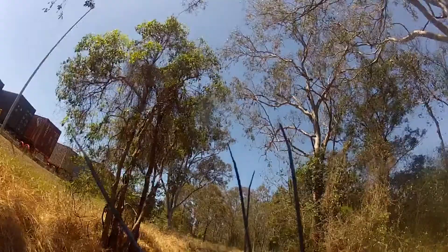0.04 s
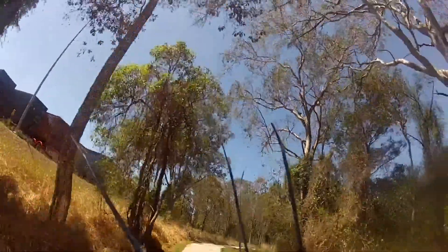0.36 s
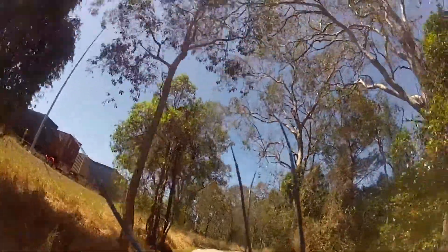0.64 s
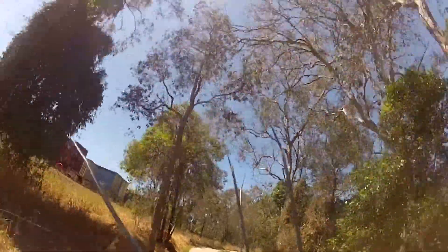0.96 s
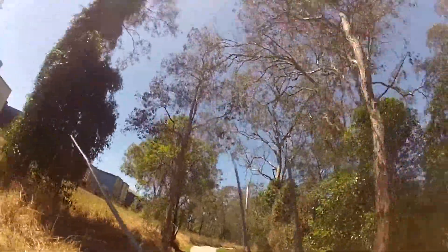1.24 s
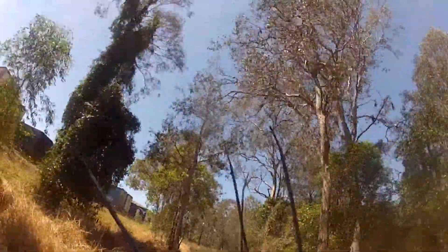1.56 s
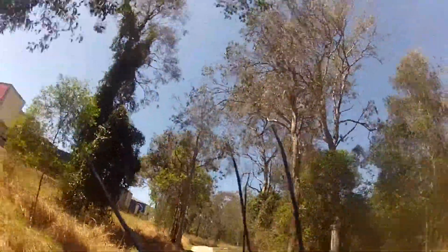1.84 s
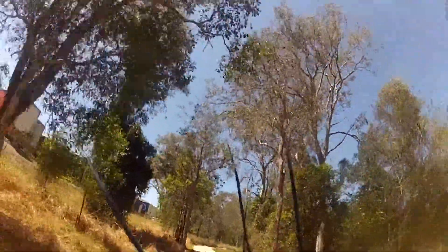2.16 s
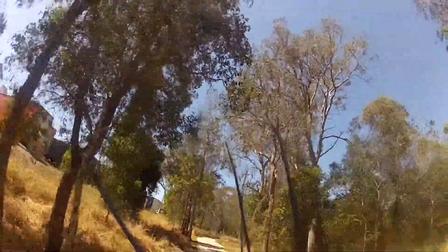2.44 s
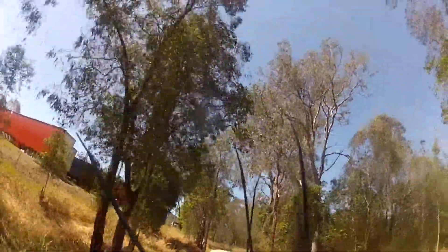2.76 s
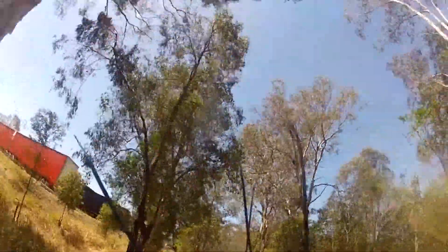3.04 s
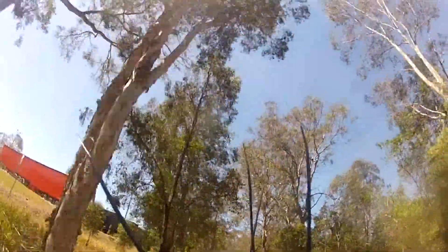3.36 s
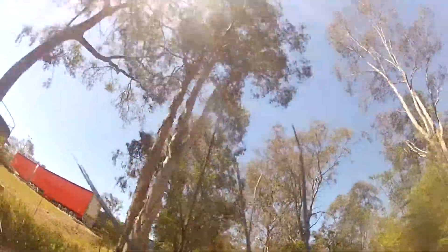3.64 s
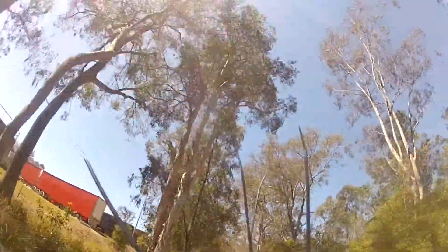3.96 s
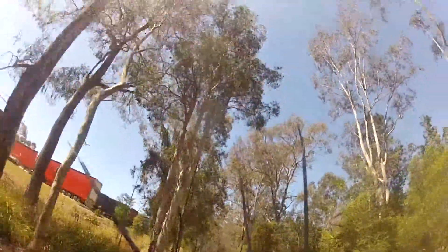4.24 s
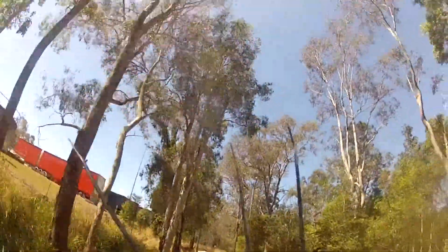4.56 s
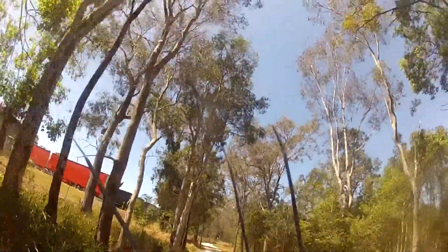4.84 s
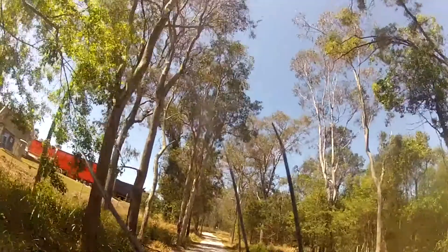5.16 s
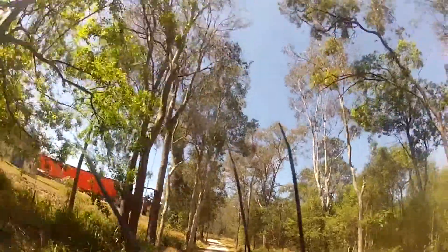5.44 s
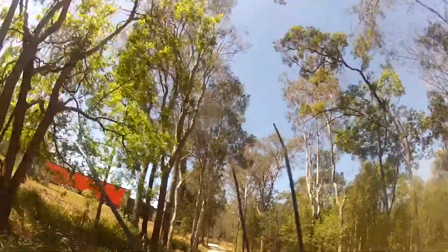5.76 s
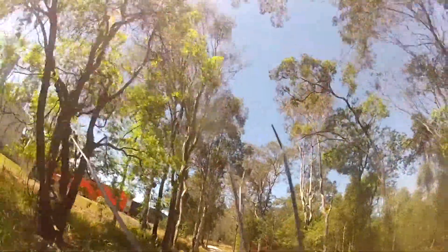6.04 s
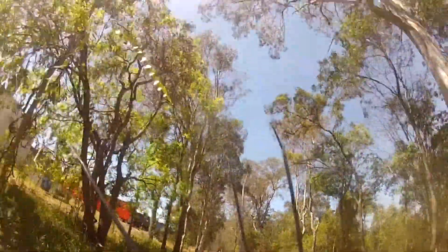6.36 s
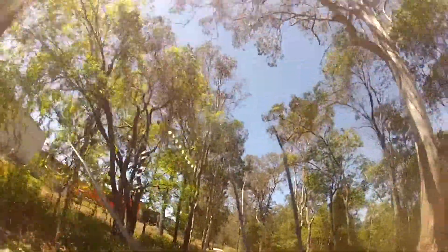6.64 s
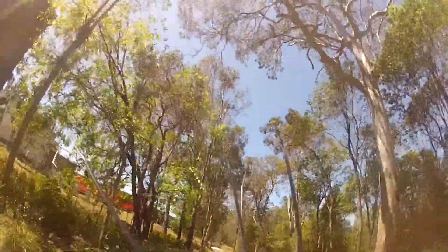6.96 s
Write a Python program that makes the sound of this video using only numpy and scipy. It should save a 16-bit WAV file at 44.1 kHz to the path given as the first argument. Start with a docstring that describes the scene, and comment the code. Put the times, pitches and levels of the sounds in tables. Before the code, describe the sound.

Wind thumps and roars on a microphone riding along a bush track, dropping briefly midway to reveal light rattles.

```python
"""Wind thumps, roars and rasps on the microphone of a small camera riding along a bush track.
Big swirls of air make the thumps; smaller ones make the roar and the bursts of rasp. Half way the
wind drops for a moment and the ride rattles. Tyres crunch faintly and a bird chirps twice.
The camera rounds off the peaks and holds each sample at a low rate, which adds a fizzy treble."""
import sys
import numpy as np
from scipy import signal
from scipy.fft import rfft, irfft
from scipy.io import wavfile
from scipy.ndimage import uniform_filter1d

SR = 44100
rng = np.random.default_rng(int(sys.argv[2]) if len(sys.argv) > 2 else 0)


def master_out(mix):
    """Clip the mix to full scale and print it as 16-bit PCM to the path in sys.argv[1]."""
    frames = np.transpose(np.atleast_2d(mix))
    ceiling = np.clip(frames, -1, 1)
    pcm = np.round(ceiling * 32767).astype(np.int16)
    wavfile.write(sys.argv[1], SR, pcm)


N = 308259
TIME = np.arange(N) / SR


def wind(cruise_db=-28, gust_db=0.53, gust_hz=7, thump_db=1.5, thump_hz=8, flutter_hz=24):
    """One airflow drives big, middling and small swirls of air that push on the microphone."""
    # Each row: time in seconds, strength of the airflow in dB.
    airflow = [(0.19, -29), (0.45, -25), (0.72, -25.5), (0.89, -32), (1.1, -25.5), (1.23, -27.5),
               (1.32, -24), (1.55, -29.5), (1.65, -25), (1.73, -29), (1.95, -22), (2.02, -26),
               (2.13, -24.5), (2.46, -27), (2.83, -26.5), (2.92, -28.5), (3.12, -25), (3.38, -31),
               (3.52, -37.5), (3.85, -48.5), (3.92, -40.5), (4.18, -46), (4.38, -44), (4.59, -28.5),
               (4.68, -35.5), (4.77, -26), (4.84, -32), (4.95, -26.5), (5.27, -26), (5.68, -33),
               (5.78, -30.5), (6.08, -26.5), (6.37, -28.5), (6.58, -31), (6.71, -28), (6.98, -31.5)]
    # Each row: time in seconds, bass boost or cut in dB.
    bass_changes = [(0.19, -0.5), (0.75, 0.5), (0.82, -1.5), (1.15, 0), (1.97, 0.5), (2.25, 1), (2.55, -4),
                    (2.9, 0), (3.8, 0), (5.3, 0.5), (6.2, 0.5), (6.98, -1)]
    # The tone of big, middling and small swirls. Each row: frequency in Hz, relative level in dB.
    buffet_tone = [(12, -25), (25, -12.5), (45, -6.5), (80, -1.5), (200, -1), (300, -2.5), (420, -12),
                   (700, -34.5)]
    roar_tone = [(150, -16), (270, -9.5), (380, -2), (520, -3.5), (720, -7.5), (950, -16.5), (1300, -38.5),
                 (2000, -69)]
    rasp_tone = [(450, -32.5), (800, 1.5), (1200, 0), (2000, -7), (2700, -10.5), (3500, -17), (3950, -13.5),
                 (4500, -23.5), (5100, -21), (6000, -23.5)]
    flutter = wander(flutter_hz)
    buffet = swirls(buffet_tone, burst_db=0.83, burst_hz=40, steady_s=0.07)
    roar = swirls(roar_tone, burst_db=0.5, burst_hz=120, steady_s=0.14) * undb(0.7 * flutter)
    rasp = swirls(rasp_tone, burst_db=1.4, burst_hz=302, steady_s=0.077) * undb(1.25 * flutter)
    rasp = unit(rasp * np.sqrt(1 + 0.066 * (buffet + roar) ** 2))  # swells on the others' peaks
    push_db = curve(airflow) - cruise_db + gust_db * wander(gust_hz)
    bass_db = curve(bass_changes)
    # As the air pushes harder, the smallest swirls grow fastest.
    buffet_db = -13 + 0.44 * push_db + bass_db + thump_db * wander(thump_hz)
    roar_db = -16.5 + 0.7 * push_db - 0.78 * bass_db  # louder when the bass thins
    rasp_db = -27 + 1.24 * push_db
    return undb(buffet_db) * buffet + undb(roar_db) * roar + undb(rasp_db) * rasp


def swirls(tone, burst_db, burst_hz, steady_s):
    """Swirling air pushes in short bursts while its average strength stays steady."""
    bursts = undb(burst_db * wander(burst_hz))
    pressure = colour(rng.standard_normal(N) * bursts, tone)
    average_power = uniform_filter1d(pressure ** 2, int(steady_s * SR))
    return pressure / np.sqrt(average_power + 1e-9)


def rattles(ring_s=0.02, crack_s=0.014, boost_db=5):
    """Each jolt gives a crack and a short ring, which fade by 60 dB in crack_s and ring_s."""
    # Each row: start in seconds, peak in dB before the boost, pitch in Hz, crack over ring in dB.
    jolts = [(3.5754, -47, 2020, -4.0), (3.6686, -34, 2580, -4.0), (3.7304, -35, 2000, 5),
             (3.7667, -33.5, 2000, 5), (3.8826, -37, 2580, -1), (3.915, -32, 1960, -4.0),
             (3.9953, -35, 2630, -8), (4.0986, -36, 2120, -2), (4.1285, -32.5, 2920, -8),
             (4.4274, -33, 1890, -5), (4.4662, -30, 1920, -6)]
    # The tones in one ring. Each row: multiple of the pitch, relative level in dB.
    ring_tones = [(.88, -8), (1, -3), (1.1, -6), (1.22, -15)]
    crack_band = signal.butter(2, [2000, 6000], "band", fs=SR, output="sos")
    out, t = np.zeros(N), TIME[:SR // 12]
    for start, peak_db, hz, crack_db in jolts:
        ring = sum(undb(db) * np.sin(2 * np.pi * hz * ratio * t + rng.uniform(0, 2 * np.pi))
                   for ratio, db in ring_tones)
        crack = unit(signal.sosfilt(crack_band, rng.standard_normal(len(t))))
        tick = ring * undb(-60 * t / ring_s) + crack * undb(crack_db - 60 * t / crack_s)
        add(out, start, undb(peak_db + boost_db) * tick / np.abs(tick).max())
    return out


def tyres(level_db=-50, grain_db=2.1, grain_hz=160):
    """Tyres roll over grit with a faint, grainy crunch."""
    # The tone of the crunch. Each row: frequency in Hz, relative level in dB.
    crunch_tone = [(200, -1), (1000, -3), (1800, -9.5), (2700, 2.5), (3400, -1.5), (4000, -2), (4600, -2.5),
                   (6000, 0.5)]
    grain = undb(grain_db * wander(grain_hz))
    return undb(level_db) * colour(rng.standard_normal(N) * grain, crunch_tone)


def bird():
    """A bird in the trees gives thin, very short whistles that slide upward."""
    # Each row: start in seconds, length in seconds, first pitch in Hz, last pitch in Hz, level in dB.
    chirps = [(4.380, .021, 4750, 5650, -42), (6.594, .014, 5300, 5900, -37)]
    out = np.zeros(N)
    for start, length, from_hz, to_hz, db in chirps:
        hz = np.linspace(from_hz, to_hz, int(length * SR))
        whistle = np.sin(2 * np.pi * np.cumsum(hz) / SR)
        add(out, start, undb(db) * np.hanning(len(hz)) * whistle)
    return out


def undb(db):
    """Turn decibels into a number to multiply a sound by."""
    return 10 ** (np.asarray(db) / 20)


def unit(x):
    """Scale a sound to an average power of one."""
    return x / np.sqrt(np.mean(x ** 2))


def colour(x, tone):
    """Shape a sound's lows and highs by rows of Hz and dB; its average power becomes one."""
    hz, db = np.transpose(tone)
    bins = np.maximum(np.fft.rfftfreq(N, 1 / SR), 1)
    gain = undb(np.interp(np.log(bins), np.log(hz), db, left=-90, right=-90))
    return unit(irfft(rfft(x) * gain, N))


def wander(rate_hz):
    """A smooth random wobble, about one in size, that changes about rate_hz times a second."""
    smoothing = np.exp(-(np.fft.rfftfreq(N, 1 / SR) / rate_hz) ** 2)
    return unit(irfft(rfft(rng.standard_normal(N)) * smoothing, N))


def curve(table):
    """Join rows of time and value with straight lines."""
    seconds, values = np.transpose(table)
    return np.interp(TIME, seconds, values)


def add(out, start_s, x):
    """Mix in a short sound at start_s."""
    i = int(start_s * SR)
    out[i:i + len(x)] += x[:N - i]


def scene():
    """All the sounds meet at one microphone."""
    return (wind() + tyres() + rattles() + bird())[None]


def record(dry, start_s=0.178, dull_hz=4400, hold_hz=12000, top_hz=15300):
    """The camera starts a moment late, rounds the peaks, dulls the highs and holds each sample."""
    live = dry * np.clip((TIME - start_s) / 0.002, 0, 1)
    rounded = live / (1 + live ** 10) ** (1 / 10)
    dull = signal.sosfilt(signal.butter(6, dull_hz, fs=SR, output="sos"), rounded)
    slow = signal.resample_poly(dull, hold_hz, SR, axis=1, window=("kaiser", 3))
    # Holding turns the wave into stairs, which mirror the sound around hold_hz as a high fizz.
    stairs = np.repeat(slow, 4, axis=1)
    fizzy = signal.resample_poly(stairs, SR, 4 * hold_hz, axis=1)[:, :N]
    return signal.sosfilt(signal.ellip(12, 0.2, 80, top_hz, fs=SR, output="sos"), fizzy)


dry = scene()
out = record(dry)
master_out(out)
```